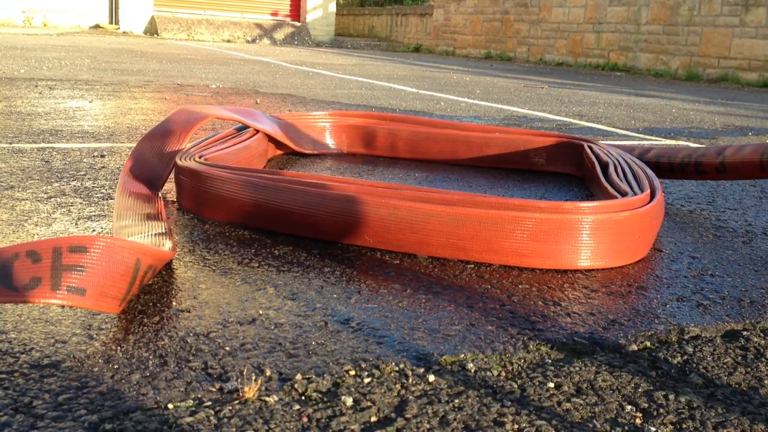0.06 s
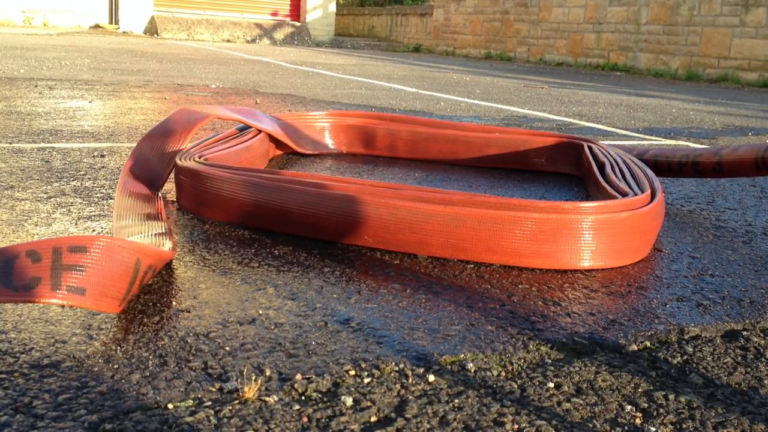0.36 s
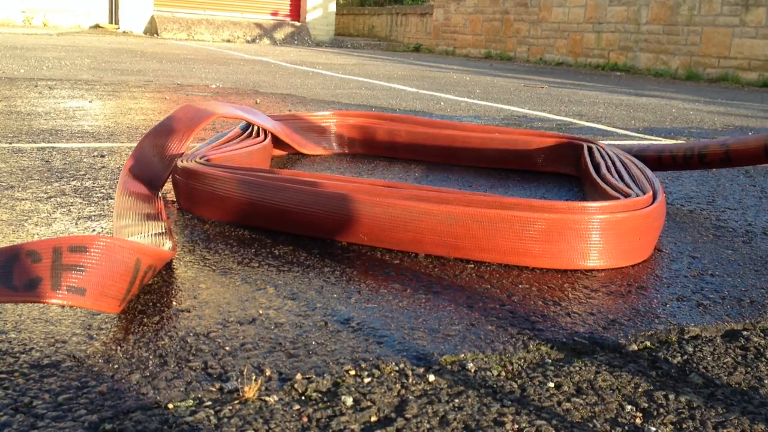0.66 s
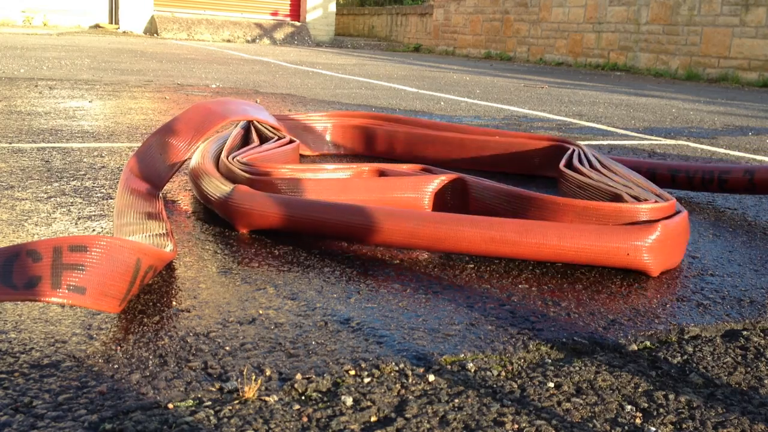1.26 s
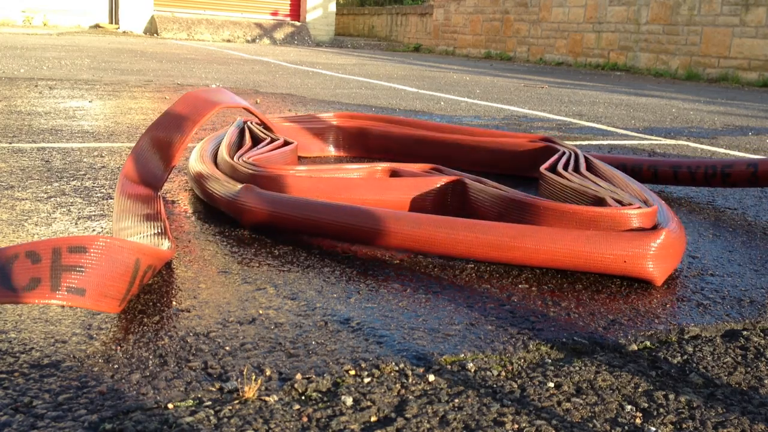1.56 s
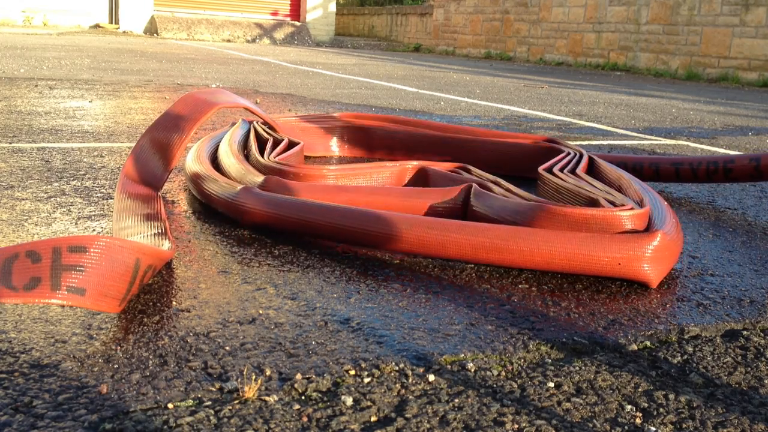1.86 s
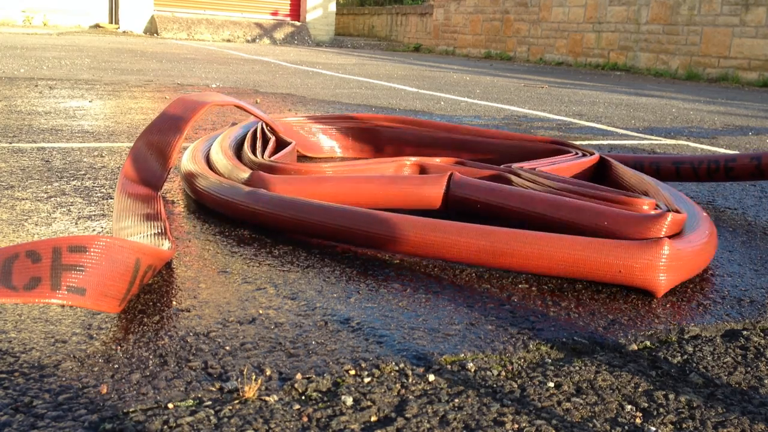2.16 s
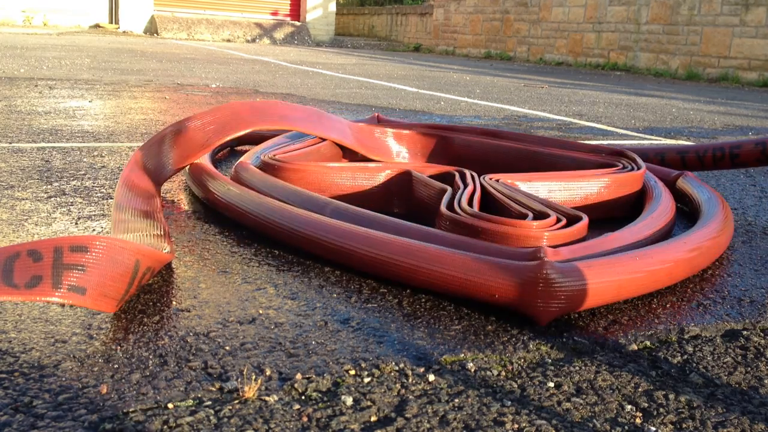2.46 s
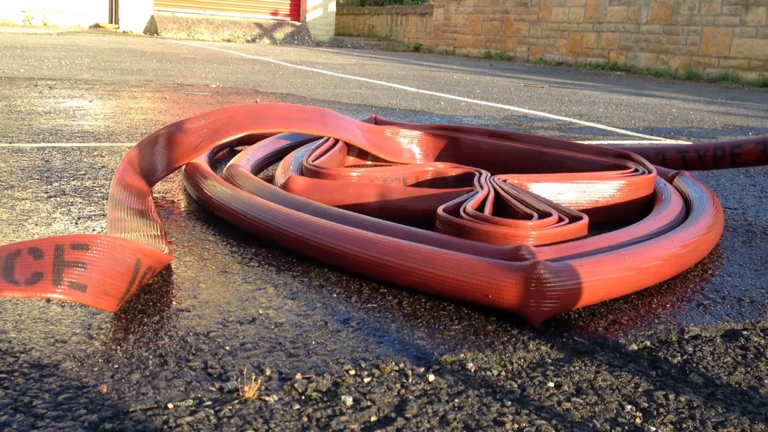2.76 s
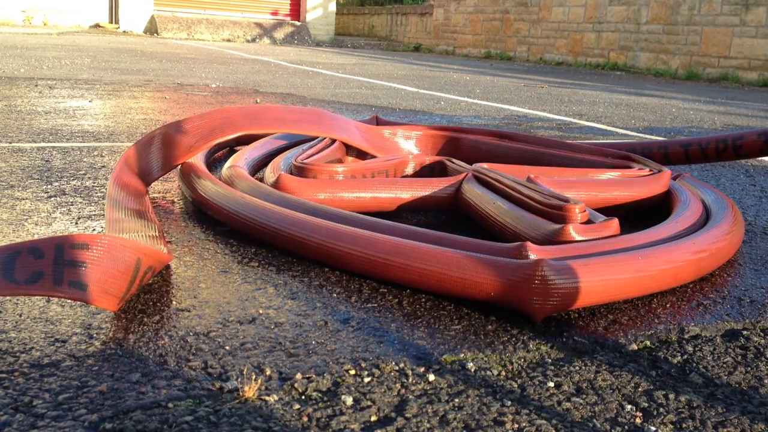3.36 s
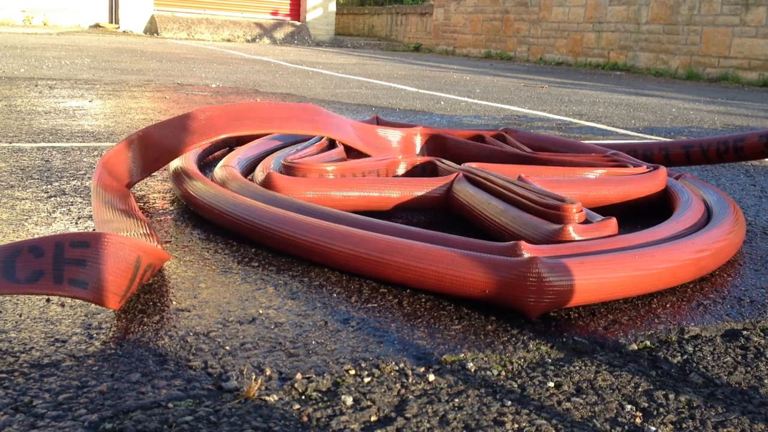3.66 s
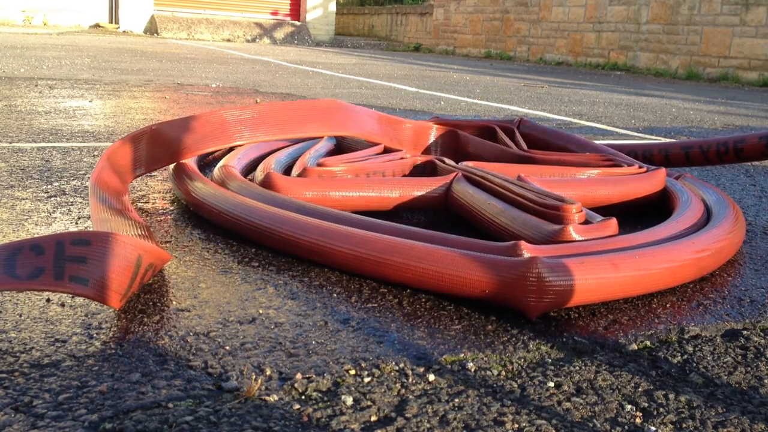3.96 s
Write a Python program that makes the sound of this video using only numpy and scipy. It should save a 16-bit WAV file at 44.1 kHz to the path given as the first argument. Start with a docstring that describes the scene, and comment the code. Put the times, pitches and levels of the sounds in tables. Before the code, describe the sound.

Water rushes into a flat fire hose, churning, snapping and hissing as it swells.

```python
"""A flat, coiled fire hose filling with water, close to the microphone on the wet tarmac of a yard.
Water churns along it, slugs thump the bends open, creases snap and trapped air rings in the folds.
The hiss of spray and sliding hose skin grows as the coil swells. Further off, a pump hums faintly
over the murmur of the yard. The pickup is mono, alike in both channels."""
import sys
import numpy as np
from scipy import signal
from scipy.fft import rfft, irfft
from scipy.io import wavfile
from scipy.ndimage import map_coordinates

SR = 44100
rng = np.random.default_rng(int(sys.argv[2]) if len(sys.argv) > 2 else 0)


def log_audio(samples):
    """Write samples as a 16-bit WAV file to the path given in sys.argv[1]."""
    # one column per channel
    frames = np.atleast_2d(samples).T
    # limit to full scale, then quantise
    limited = np.clip(frames, -1, 1)
    pcm = np.round(limited * 32767).astype(np.int16)
    wavfile.write(sys.argv[1], SR, pcm)


N = 176400
TIME_S = np.arange(N) / SR


def undb(db):
    """Decibels to gain."""
    return 10 ** (np.asarray(db) / 20)


def unit(x):
    """Scale to rms 1."""
    return x / np.sqrt(np.mean(x ** 2) + 1e-18)


def follow(curve):
    """Gain along a curve of (time_s, level_db) points."""
    return undb(np.interp(TIME_S, *np.array(curve).T))


def colour(x, points):
    """Causal filter through (frequency_hz, gain_db) points that keeps the power of white noise."""
    size = 2 * N
    hz, db = np.array(points).T
    gain = undb(np.interp(np.log(np.fft.rfftfreq(size, 1 / SR) + 1), np.log(hz), db))
    cepstrum = irfft(np.log(unit(gain)))
    cepstrum[1:N] *= 2  # folded onto positive time for minimum phase
    cepstrum[N + 1:] = 0
    return irfft(rfft(x, size) * np.exp(rfft(cepstrum)))[:N]


def walk(per_s):
    """Smooth random wander of spread near 1."""
    return map_coordinates(rng.standard_normal(2048), [TIME_S * per_s], order=2, mode="wrap")


def grains(per_s, spread_db):
    """Random tiny bursts of uneven size, rms 1."""
    fires = rng.random(N) < per_s / SR
    size = undb(spread_db * np.clip(rng.standard_normal(N), -2.5, 2.5))
    return unit(fires * rng.choice([-1, 1], N) * size)


def wetness(arrival_s=0.875, rise_s=0.15):
    """Rises from 0 to 1 as the water reaches the coil."""
    return np.clip((TIME_S - arrival_s) / rise_s + .5, 0, 1)


def yard(level_db=-54.5):
    """The steady murmur of the yard behind everything."""
    return undb(level_db) * colour(rng.standard_normal(N), [(70, -38), (200, 9), (1300, 10), (15000, -38)])


def pump():
    """A pump some way off hums faintly, its two tones wavering together."""
    # tones of the hum: pitch_hz, level_db
    tones = [(218,-60.5),(1157,-54)]
    clock_s = np.cumsum(1 + 0.00297 * walk(7.7)) / SR
    return sum(undb(db) * np.sqrt(2) * np.sin(2 * np.pi * (hz * clock_s + rng.random()))
               for hz, db in tones)


def hiss(mist_edge_hz=8460, mist_db=(-51, -36)):
    """Spray and sliding hose skin fizz, brighter once the coil is wet; mist grows with the pressure."""
    # loudness of the fizz: time_s, level_db
    fizz_level = [(0,-45),(.18,-42),(.7,-47),(.97,-42.5),(1.17,-43.5),(1.3,-39.5),(1.54,-40),(1.58,-35.5),(1.92,-35.5),(2.12,-44.5),(2.2,-39.5),(2.225,-29),(2.32,-34.5),(2.42,-27.5),(2.66,-35.5),(2.85,-37.5),(2.95,-29.5),(3.04,-40.5),(3.12,-40),(3.14,-27),(3.22,-23.5),(3.37,-31),(3.53,-26),(4,-31)]
    # spectrum of the hose lying flat: frequency_hz, gain_db
    flat_colour = [(1500,-13),(2600,-3.5),(4100,-1.5),(5100,-5.5),(6400,-5.5),(7600,-11),(15000,-31)]
    # spectrum of the filled hose: frequency_hz, gain_db
    full_colour = [(200,-25),(1500,-14.5),(2800,-1.5),(4850,2.5),(5100,-7),(5450,2),(6900,1.5),(7600,-3.5),(9000,-2.5),(10400,-15),(12200,-13),(14000,-20.5)]
    wet = wetness()
    fizz = grains(per_s=24000, spread_db=1.5) * undb(1.05 * walk(70))
    skin = (1 - wet) * undb(2.0) * colour(fizz, flat_colour) + wet * colour(fizz, full_colour)
    highpass = signal.butter(1, mist_edge_hz, "high", fs=SR, output="sos")
    mist = unit(signal.sosfilt(highpass, rng.standard_normal(N)))
    return skin * follow(fizz_level) + wet * mist * undb(np.linspace(*mist_db, N))


def sprays():
    """Bright jets of droplets swell quickly and die away."""
    # spurts of fine spray: start_s, level_db, rise_s
    jets = [(1.555,-44,0.072),(2.205,-38.5,0.032),(2.87,-31,0.047)]
    # spectrum of the droplets: frequency_hz, gain_db
    spray_colour = [(4500,-29),(6800,9),(10300,-10),(12500,1),(15000,-14)]
    flow = np.zeros(N)
    for start, db, rise in jets:
        age = np.maximum(TIME_S - start, 0) / rise
        flow += undb(db) * (age * np.exp(1 - age)) ** 2
    return flow * colour(rng.standard_normal(N), spray_colour)


def folds(waver=.009, fade_s=0.019, stutter_db=2):
    """Turbulence rings the air in each pinched fold in puffs; the pitch drifts as the pocket resizes."""
    # singing air pockets: start_s, end_s, start_hz, end_hz, width_hz, level_db
    pockets = [(0,0.372,440,465,45,-44),(0,0.31,755,780,76,-48),(0.067,0.546,1860,1995,200,-42),(0.07,.57,4080,4094,75,-49),(0.527,0.657,2284,2260,150,-44),(0.577,0.691,2105,1620,260,-45.5),(0.659,0.862,1485,1350,160,-41.5),
               (0.658,0.92,3110,3050,220,-47),(0.78,.88,4170,4190,90,-48),(0.91,1.021,3370,3460,900,-37),(1.556,1.615,3230,3280,320,-35.5),(2.34,2.569,1865,2120,250,-29),(2.578,2.992,2060,1997,240,-36),
               (2.423,4.065,4640,4610,300,-42.5),(3.169,4.001,2410,2490,240,-37)]
    out = np.zeros(N)
    for start, end, start_hz, end_hz, width, db in pockets:
        lowpass = signal.butter(2, width / 2, fs=SR, output="sos")
        turbulence = signal.sosfilt(lowpass, rng.standard_normal((2, N)))
        pitch_hz = np.interp(TIME_S, [start, end], [start_hz, end_hz]) * (1 + waver * walk(per_s=18))
        phase = 2 * np.pi * np.cumsum(pitch_hz) / SR
        ring = unit(turbulence[0] * np.cos(phase) + turbulence[1] * np.sin(phase))
        gate = np.clip(np.minimum(TIME_S - start, end - TIME_S) / fade_s + .5, 0, 1)
        out += undb(db + stutter_db * walk(per_s=90)) * gate * ring
    return out


def snaps(crack_s=0.00028, crack_db=-15.5):
    """A tiny crack, then one sharp cycle for a crease or several for an air pocket."""
    # creases snapping and air pockets popping: start_s, level_db, pitch_hz, decay_s
    pops = [(.941,-15.5,3100,0.0013),(0.9734,-9,1470,0.00064),(0.986,-13,1500,0.00073),(1.0148,-15,1330,0.0015),(1.108,-16,720,0.0019),(1.386,-17,1320,0.0032),(1.401,-14,1220,0.0025),(1.443,-17.5,1320,0.0027),(1.645,-15.5,800,0.0039),(1.6605,-16,945,0.0054),
            (2.3045,-12,1110,0.00099),(2.31,-8.5,1250,0.0011),(2.362,-12,1790,0.0058),(2.414,-11.5,1940,0.0075),(2.438,-10.5,2070,0.0036),(2.617,-14.5,526,0.0051),(2.707,-7,1750,0.00039)]
    out, noise = np.zeros(N), rng.standard_normal(N)
    for start, db, hz, decay in pops:
        age = np.clip(TIME_S - start, 0, 20 * decay)
        ring = np.exp(-age / decay) * np.sin(2 * np.pi * hz * age)
        crack = undb(crack_db) * noise * (age > 0) * np.exp(-age / crack_s)
        out += undb(db) * (ring + crack)
    return signal.sosfilt(signal.butter(2, 450, "high", fs=SR, output="sos"), out)


def thumps(attack_s=0.0031, slap_boost_db=15.5):
    """Each slug slaps the hose wall once, then dies away in a quick cluster of dull knocks."""
    # slugs of water opening a bend: start_s, level_db, decay_s
    slugs = [(0.444,-29.5,0.02),(1.386,-27,0.036),(1.433,-29.5,0.021),(1.644,-24.5,0.034),(1.716,-30.5,0.017),
             (2.224,-13,0.017),(2.253,-20.5,0.042),(2.282,-20.5,0.039),(2.593,-27.5,0.078),(2.809,-25,0.018),(3.75,-25.5,0.018),(3.792,-31.5,0.035)]
    # spectrum of the struck wall: frequency_hz, gain_db
    wall_colour = [(45,-26),(90,-12.5),(150,-9),(280,2),(750,2),(1100,0.5),(1600,-14),(2400,-10),(12000,-40)]
    force, slap = np.zeros(N), np.zeros(N)
    for start, db, decay in slugs:
        age = np.maximum(TIME_S - start, 0)
        force += undb(db) * np.minimum(age / attack_s, 1) * np.exp(-age / decay)
        slap[int(start * SR)] = undb(db + slap_boost_db)
    knocks = force * grains(per_s=2000, spread_db=-0.5)
    return colour(slap + knocks, wall_colour)


def churn(crackle_db=-10):
    """Collapsing bubbles ring the wall in spurts and the stretching weave crackles, over rumbling water."""
    # water churning in the hose: time_s, level_db
    rush_level = [(0,-38),(.15,-35.5),(.5,-38.5),(.7,-45),(.955,-38),(.985,-28),(1.07,-34),(1.19,-38.5),(1.31,-26),(1.35,-32.5),(1.42,-30.5),(1.62,-33),(1.85,-30),(2.12,-41.5),(2.21,-38.5),(2.23,-27.5),(2.53,-26.5),(2.86,-35.5),(2.96,-26.5),(3.04,-41),(3.12,-41.5),(3.14,-30.5),(3.295,-22),(3.36,-30),(3.52,-28),(4,-35.5)]
    # spectrum of the churning: frequency_hz, gain_db
    rush_colour = [(400,-27),(900,-2),(1130,-6),(1360,0),(1560,-4.5),(1930,-1.5),(2600,-6),(3400,-7),(4300,-16.5),(5200,-31.5)]
    # rumble of the filling hose: time_s, level_db
    rumble_level = [(0,-50.5),(.4,-43.5),(.62,-50),(.78,-51),(.89,-38.5),(1.32,-32.5),(1.55,-40.5),(1.88,-36),(2.12,-49.5),(2.2,-39),(2.34,-25.5),(2.5,-37),(3.28,-33.5),(3.55,-37),(4,-46.5)]
    # spectrum of the rumble: frequency_hz, gain_db
    rumble_colour = [(80,-38),(135,-9),(200,-0.5),(600,7.5),(900,1),(1500,1),(4000,-26)]
    spurt = walk(55)
    bubbles = grains(per_s=3500, spread_db=1.5) * undb(1.9 * spurt - 1.1)
    crackle = grains(per_s=250, spread_db=3.5) * wetness() * undb(crackle_db)
    surge = grains(per_s=900, spread_db=1.5) * undb(spurt + 1.05 * walk(21))
    rush = colour(bubbles + crackle, rush_colour) * follow(rush_level)
    rumble = colour(surge, rumble_colour) * follow(rumble_level)
    return rush + rumble


def hose_ring(x):
    """The water-filled hose rings at its own resonances."""
    # resonances against the direct sound: pitch_hz, width_hz, gain_db
    modes = [(291,29,-9),(880,19,-10),(1282,103,-1),(1594,51,-9.5),(4540,120,-10.5)]
    return sum(undb(db) * signal.lfilter(*signal.iirpeak(hz, hz / width, fs=SR), x)
               for hz, width, db in modes)


def scene():
    """The hose close to the microphone, the pump and the yard behind it, in mono."""
    hose = churn() + hiss() + sprays() + folds() + thumps() + snaps()
    mono = hose + wetness() * hose_ring(hose) + pump() + yard()
    return np.array([mono, mono])


def record(dry, low_cut_hz=110, top_hz=15300):
    """The recorder thins the deep bass and cuts the top steeply."""
    thin = signal.sosfilt(signal.butter(4, low_cut_hz, "high", fs=SR, output="sos"), dry)
    return signal.sosfilt(signal.ellip(12, .2, 90, top_hz, fs=SR, output="sos"), thin)


dry = scene()
out = record(dry)
log_audio(out)
```